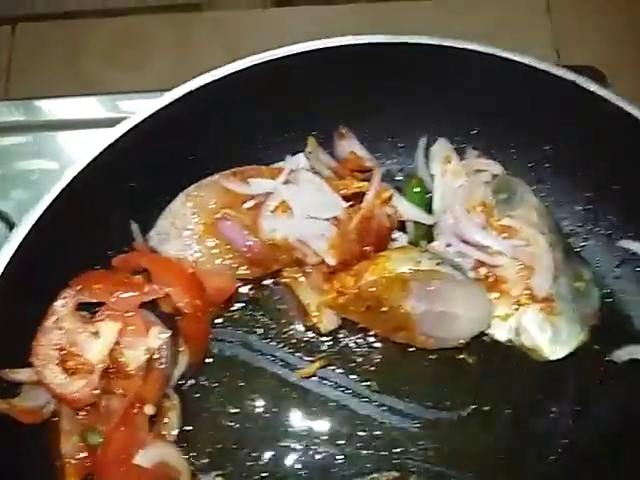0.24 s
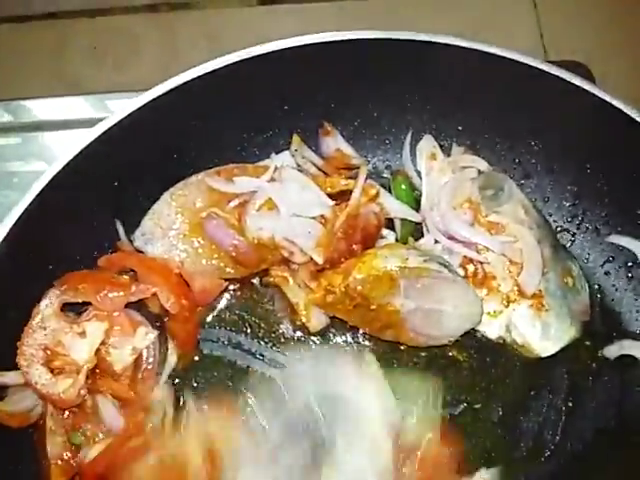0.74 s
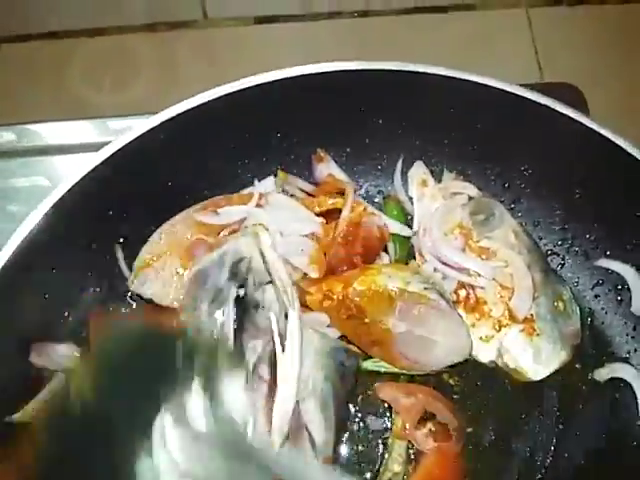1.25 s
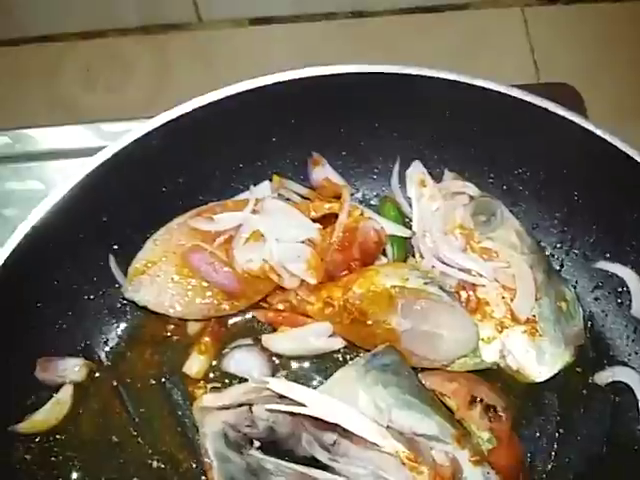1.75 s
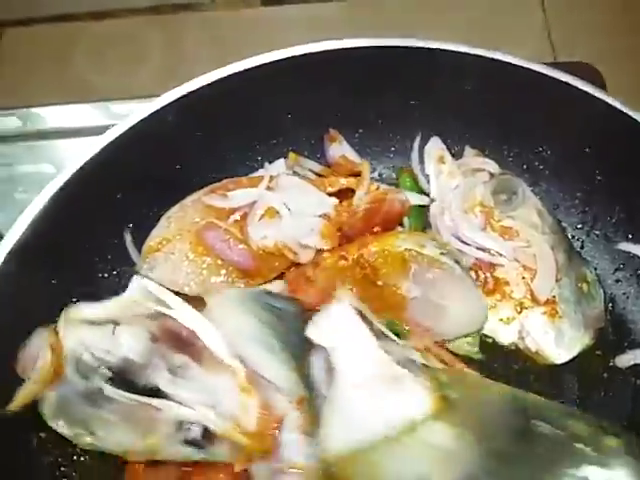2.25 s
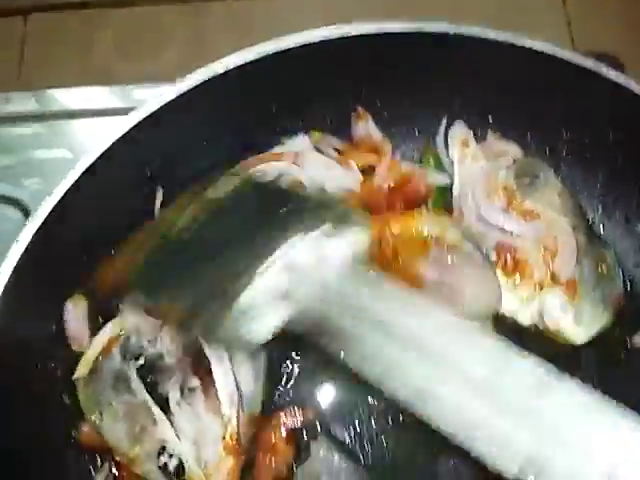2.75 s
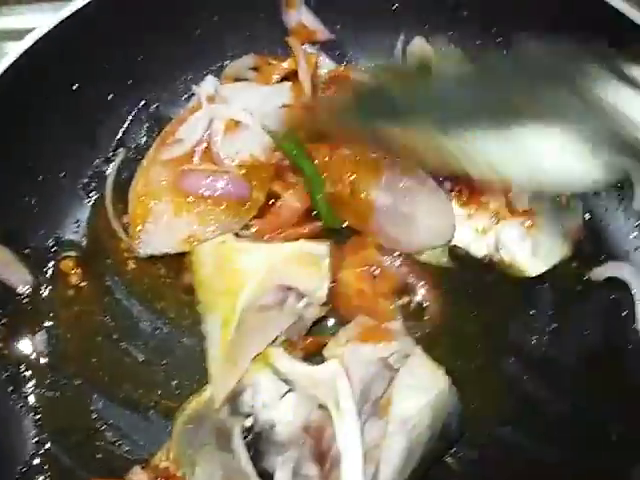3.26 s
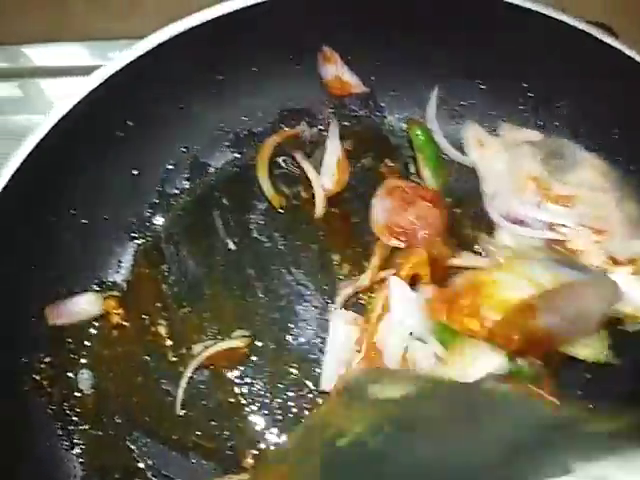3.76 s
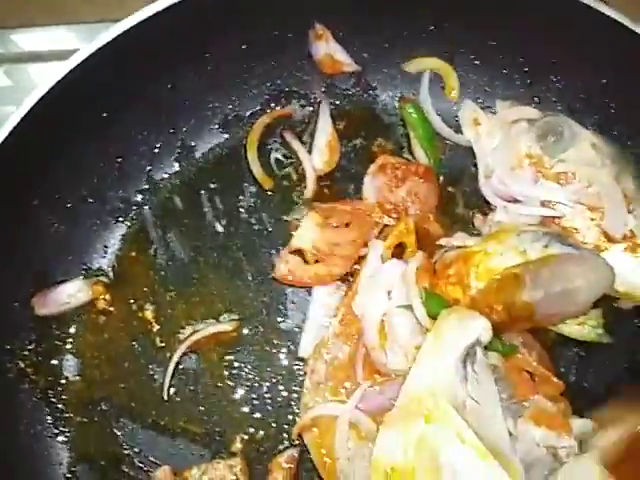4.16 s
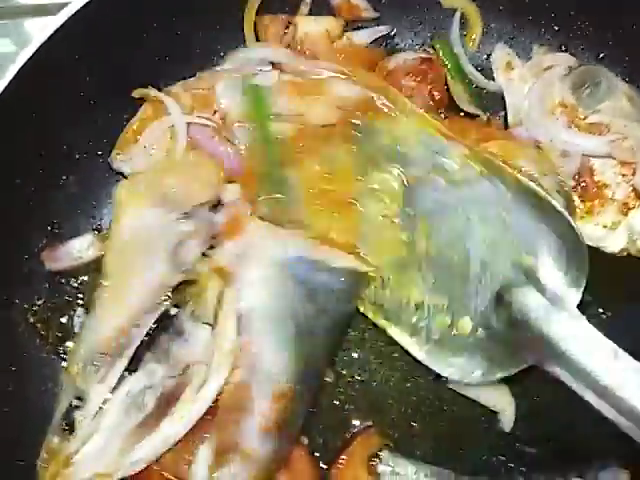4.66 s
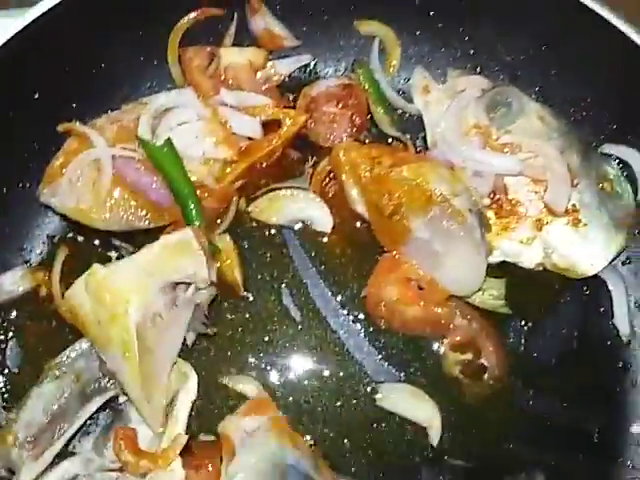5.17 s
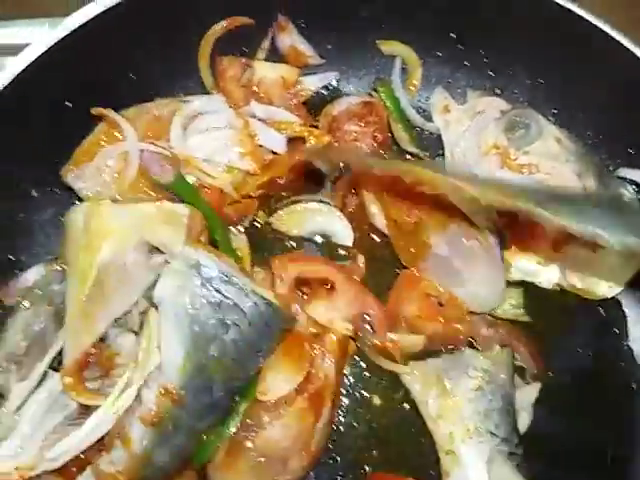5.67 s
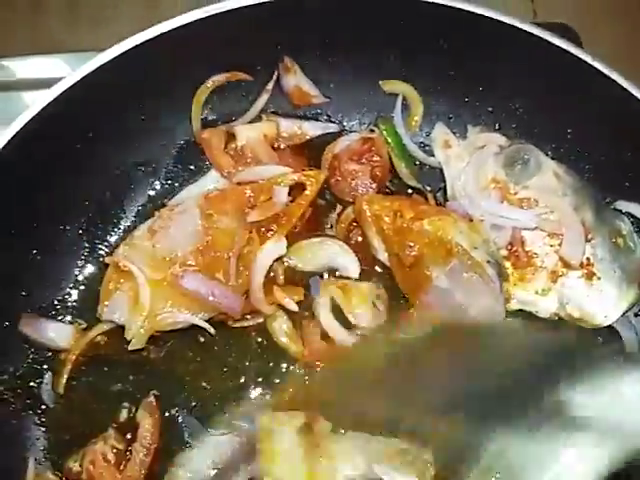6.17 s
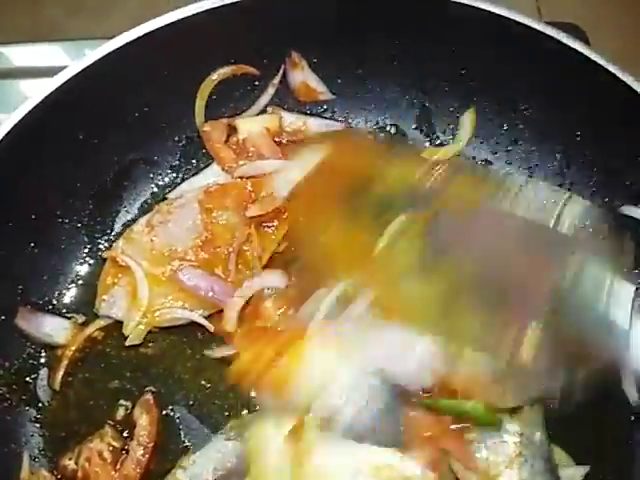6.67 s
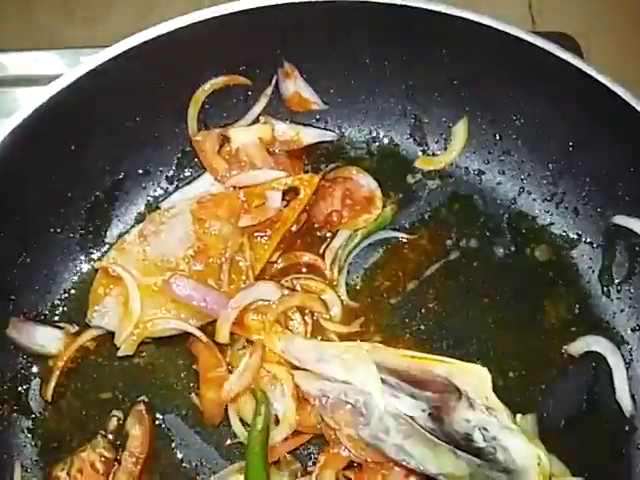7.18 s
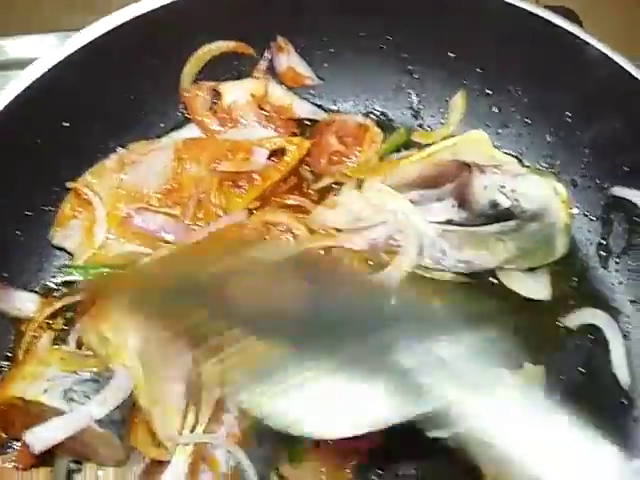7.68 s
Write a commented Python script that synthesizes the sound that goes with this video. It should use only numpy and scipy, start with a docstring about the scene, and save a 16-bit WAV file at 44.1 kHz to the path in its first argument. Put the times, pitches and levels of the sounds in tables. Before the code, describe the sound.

Close to the microphone, a metal spatula knocks against a frying pan and drags over its coating in quick, uneven strokes, now and then catching with a tiny squeal. Quiet wet slides of fish and vegetables and small ticks of oil fill the gaps. The strongest clanks come near the start, in the middle and twice near the end. A small kitchen adds short reverberation, low rumble and faint hum.

```python
"""A steel utensil knocks and scrapes in a nonstick pan, turning raw fish, onion and tomato in oil.
Each stroke sets the pan ringing as the edge lands and trips over the coating; sometimes it catches
in a short stick-slip squeal. Between strokes the wet food slides and squelches, and oil films snap.
A small tiled kitchen reverberates around it all, over a bed of low rumble and faint mains hum."""
import sys
import numpy as np
from scipy import signal
from scipy.fft import rfft, irfft
from scipy.io import wavfile
from scipy.ndimage import uniform_filter1d

SR = 44100
rng = np.random.default_rng(int(sys.argv[2]) if len(sys.argv) > 2 else 0)


def inscribe(sig):
    """Save sig as 16-bit PCM at rate SR to the path in sys.argv[1].

    A 1-D sig is mono; a 2-D sig holds one channel per row.
    Samples are clipped to [-1, 1] before scaling.
    """
    pcm = np.round(np.clip(np.atleast_2d(sig).T, -1, 1) * 32767)
    wavfile.write(sys.argv[1], SR, pcm.astype(np.int16))


N = 349272
TIME = np.arange(N) / SR
RING_TIME = TIME[:SR // 6]   # time axis of one ring of the pan

# tone of the room rumble: f/Hz, relative level/dB
RUMBLE_SPECTRUM = [(18, -60.5), (30, -22.5), (102, -1.5), (156, -10), (219, -16.5), (324, -8.5), (410, -16),
                   (455, -11), (591, -16), (639, -18), (1400, -24), (2300, -33), (2830, -34), (3880, -45.5),
                   (15500, -53.5)]
# partials of the mains hum: f/Hz, level/dB
HUM_PARTIALS = [(100, -65.5), (150, -64)]
# decay of the kitchen reverb: f/Hz, t60/s (capped in kitchen_reverb)
REVERB_DECAY = [(150, 0.77), (400, 0.58), (1200, 0.4), (3000, 0.43), (7000, .5), (15000, 0.86)]
# tone of the kitchen reverb: f/Hz, level/dB
REVERB_SPECTRUM = [(150, -21.5), (400, -11), (1200, -15.5), (3000, -10), (7000, -15.5), (15000, -13.5)]
# oil films snapping and scraps dropping: t/s, level/dB, f/Hz
WET_TICKS = [(0.055, -53, 6500), (0.1336, -44.5, 6200), (0.929, -37, 6000), (1.3488, -54.5, 6300),
             (2.4718, -44, 6250), (2.5422, -45, 5800), (2.974, -43, 5730), (4.584, -39, 4760),
             (4.7296, -47.5, 6350), (6.173, -37.5, 3550), (6.799, -46, 6900), (6.8313, -45, 7040),
             (6.8922, -47, 6460), (7.5878, -46, 7750), (7.7096, -46, 7200)]
# tone of the wet food: f/Hz, relative level/dB
FOOD_SPECTRUM = [(700, -16), (1100, 1.5), (1700, -7.5), (3500, -8.5), (5000, 4), (6600, 4), (8000, -23.5),
                 (12000, -42), (15500, -27.5)]
# food sliding: fastest moment t/s, length/s, smear level/dB, crackle level/dB, squelch f/Hz
FOOD_SLIDES = [(0.0, 0.28, -52.5, -55.5, 1200), (1.519, 0.23, -48.5, -57.5, 2780),
               (2.387, 0.57, -57, -66, 2220), (3.057, 0.29, -52, -59.5, 2760),
               (3.76, 0.31, -45, -55.5, 2100), (4.59, 0.3, -52, -58, 2110), (5.041, 0.3, -57, -68, 2700),
               (6.209, 0.22, -48.5, -55.5, 3260), (6.826, 0.35, -60, -62.5, 2400),
               (7.708, 0.42, -63.5, -75.5, 1600)]
# pan and blade ringing together: f/Hz, width/Hz, level/dB
RING_MODES = [(156.2, 4.9, -8), (239, 126, -24.5), (312, 15, 6), (351.6, 14.6, -4.5), (427, 24.8, 3),
              (526.5, 4.1, -6), (555, 55, -12.5), (608.7, 12, -1.5), (650.6, 6.2, -12.5), (698, 13, -6.5),
              (870, 6.7, -9), (1058, 28, -10), (1049, 43, 2), (1097, 25, 0), (1252, 5.1, -2),
              (1610, 127, -1), (1653, 40, 3.5), (1737, 53, -5.5), (1916, 9.8, -3), (2070, 220, -13.5),
              (2349, 22.5, -7.5), (2430, 120, -16.5), (3020, 19, -23.5), (3894, 220, -22.5),
              (4950, 280, -26.5), (6100, 105, -19), (6320, 110, -26), (6800, 160, -24.5), (8040, 88, -29),
              (9300, 160, -32), (10270, 330, -39)]
# wash of weaker modes between the clear ones: f/Hz, relative level/dB
WASH_SPECTRUM = [(100, -27), (250, -9.5), (600, -27.5), (850, -13), (1300, -6), (2600, -14.5), (4500, -24),
                 (6600, -21.5), (7600, -31), (11000, -38), (15500, -42.5)]
# short pitched squeals of the steel edge, and one squelch of sliding wet food at 3.79 s:
# middle t/s, length/s, f/Hz, level/dB
SQUEALS_AND_SQUELCH = [(0.837, 0.042, 3994, -35), (0.836, 0.04, 2320, -30), (0.861, 0.02, 1125, -34.5),
                       (2.159, 0.04, 1128, -20.5), (2.202, 0.051, 1129, -19.5), (3.078, 0.066, 1118, -37.5),
                       (3.71, 0.02, 3100, -29), (3.711, 0.034, 6900, -30), (3.79, 0.071, 2100, -37),
                       (4.42, 0.062, 1130, -25.5), (5.539, 0.052, 1670, -27.5), (5.604, 0.04, 1025, -25),
                       (6.66, 0.038, 1103, -32), (6.66, 0.042, 1607, -32), (7.432, 0.036, 1067, -15.5),
                       (7.453, 0.069, 1653, -27)]
# low, mid and high register of the knocks and strokes: lower f/Hz, upper f/Hz
REGISTERS = [(90, 800), (800, 2800), (2800, 17000)]
# steel striking the pan: t/s, thump level/dB, clank level/dB, tick level/dB
STEEL_KNOCKS = [(0.234, -56, -48, -51.5), (0.7235, -14.5, -18, -20), (1.9061, -23.5, -17.5, -25.5),
                (2.073, -16, -31, -23.5), (2.15, -28, -25, -24), (2.196, -27, -28, -29),
                (2.3749, -34, -28, -39), (3.023, -40, -39, -39), (3.536, -24, -30, -48),
                (3.776, -53, -40, -36.5), (4.1438, -12, -20, -19), (4.3246, -14, -20, -29),
                (4.3524, -20, -18.5, -12), (5.4205, -23.5, -26.5, -37), (5.5892, -33, -29, -26),
                (6.4747, -11.5, -13, -21.5), (7.366, -18, -10.5, -35)]
# steel dragging over the pan: start t/s, length/s, opening judder level/dB, judder fall/dB,
# final scrape level/dB, final grit level/dB, swell of scrape and grit/dB
STEEL_STROKES = [(0.718, 0.15, -31, 5, -26, -33, 15), (1.9, 0.16, -44.5, -1, -43, -51, -1.5),
                 (2.069, 0.14, -25, 18, -28, -37.5, -1.5), (3.03, 0.043, -54.5, -11.5, -36, -38, 19),
                 (3.533, 0.11, -34.5, -2, -41.5, -47.5, 4.5), (3.692, 0.027, -58, -10.5, -30.5, -30, 5.5),
                 (4.14, 0.16, -32, 0.5, -41, -34, 11.5), (4.333, 0.11, -27.5, 20, -27.5, -33.5, 3.5),
                 (5.414, 0.17, -36, -7, -26.5, -42.5, 18), (6.474, 0.19, -29.5, 12.5, -28.5, -32, 8.5),
                 (7.374, 0.091, -28, 1.5, -21.5, -36.5, 7)]


def from_db(db):
    """Decibels to gain."""
    return 10 ** (np.asarray(db) / 20)


def unit_rms(x):
    """Scale to unit rms."""
    return x / np.sqrt(np.mean(x ** 2) + 1e-20)


def at_hz(points, hz):
    """Read a table on a log-frequency axis."""
    f, value = np.transpose(points)
    return np.interp(np.log(np.maximum(hz, 1)), np.log(f), value)


def band(x, low_hz, high_hz, order=3):
    """Causal band-pass."""
    sos = signal.butter(order, [low_hz, min(high_hz, SR / 2 - 1)], "band", fs=SR, output="sos")
    return signal.sosfilt(sos, x + 1e-18)


def colour(x, spectrum):
    """EQ a noise with a spectrum table."""
    gain = from_db(at_hz(spectrum, np.fft.rfftfreq(len(x), 1 / SR)))
    return irfft(rfft(x) * gain, len(x))


def drift(per_s):
    """Random modulation of unit rms, gliding to a new value per_s times a second."""
    knots = rng.standard_normal(int(N / SR * per_s) + 2)
    return unit_rms(np.interp(TIME * per_s, np.arange(len(knots)), knots))


def add(out, start_s, sound):
    """Mix a sound in at a time."""
    start = max(round(start_s * SR), 0)
    out[start:start + len(sound)] += sound[:N - start]


def grains(per_s, spread_db):
    """Tiny contacts of uneven size at random moments."""
    sizes = from_db(spread_db * np.minimum(rng.exponential(1, N), 4)) * rng.choice([-1, 1], N)
    return sizes * (rng.random(N) < per_s / SR)


def levelled(x, over_s):
    """Ride the gain to hold the short-term level steady and keep the grain inside it."""
    return x / np.sqrt(uniform_filter1d(x ** 2, int(over_s * SR)) + 1e-9)


def room_tone(rumble_db=-53, waver_db=2.0, waver_below_hz=250, hum_waver_db=3):
    """The bed: steady kitchen noise with a wavering low end, and a wavering mains hum."""
    noise = unit_rms(colour(rng.standard_normal(N), RUMBLE_SPECTRUM)) * from_db(rumble_db)
    low = signal.sosfiltfilt(signal.butter(2, waver_below_hz, fs=SR, output="sos"), noise)
    hum = 0
    for hz, db in HUM_PARTIALS:
        amplitude = np.sqrt(2) * from_db(db + hum_waver_db * drift(6.3))
        hum += amplitude * np.sin(2 * np.pi * hz * TIME + .5 * drift(14))
    return noise - low + low * from_db(waver_db * drift(22)) + hum


def kitchen_reverb(x, build_s=0.0018, longest_t60_s=0.8):
    """Diffuse reflections off the tiles, each octave dying at its own rate."""
    t, response = TIME[:SR], 0
    octave_edges_hz = 90 * 2. ** np.arange(9)
    for low, high in zip(octave_edges_hz, octave_edges_hz[1:]):
        hz = np.sqrt(low * high)
        t60 = min(at_hz(REVERB_DECAY, hz), longest_t60_s)
        decay = np.exp(-np.log(1000) * t / t60) * (1 - np.exp(-t / build_s))
        tail = band(rng.standard_normal(SR) * decay / np.linalg.norm(decay), low, high)
        response += from_db(at_hz(REVERB_SPECTRUM, hz)) * tail
    return signal.fftconvolve(x, response)[:N]


def wet_ticks(decay_s=0.0039, splash_db=-13, trim_db=1.0):
    """An oil film snaps or a scrap drops: a brief pitched pop in a broad splash."""
    out, t = np.zeros(N), TIME[:SR // 20]
    for start, db, hz in WET_TICKS:
        burst = rng.standard_normal(len(t)) * np.exp(-t / decay_s)
        pop = band(burst, hz * 0.887, hz * 1.1, order=2)
        snap = pop + from_db(splash_db) * band(burst, 4500, 9100, order=2)
        add(out, start, from_db(db + trim_db) * snap / np.abs(snap).max())
    return out


def slide_swell(progress, rise_share=0.45, ends_db=-13.5):
    """A piece of food gathers speed, peaks at progress 0 and settles a little more slowly."""
    from_peak = np.maximum(-progress / rise_share, progress / (1 - rise_share))
    return from_db(ends_db * from_peak ** 2)


def sliding_food(rings, clump_db=4.0, ring_db=5, pop_db=-5, squelch_db=-2.5, squelch_octaves=0.49):
    """Oily pieces peel off in clumps of tiny snaps, stirring the pan and the wet gap under each piece."""
    snaps = levelled(grains(per_s=4500, spread_db=1.5) * from_db(clump_db * drift(90)), over_s=0.025)
    ringing = signal.fftconvolve(snaps, rings.sum(axis=0))[:N]
    texture = colour(snaps, FOOD_SPECTRUM) + from_db(ring_db) * ringing
    body = unit_rms(band(texture, 610, 4100, order=4))
    fizz = unit_rms(band(texture, 3300, 9000))
    pops = unit_rms(band(grains(per_s=53, spread_db=2.0), 3000, 8000))   # small oil films bursting
    crackle = unit_rms(fizz + from_db(pop_db) * pops)
    out, edge_ratio = np.zeros(N), 2 ** (squelch_octaves / 2)
    for fastest, length, smear_db, crackle_db, hz in FOOD_SLIDES:
        on = np.abs(TIME - fastest) < length
        squelch = unit_rms(band(snaps[on], hz / edge_ratio, hz * edge_ratio, order=1))   # gap resonance
        smear = unit_rms(body[on] + from_db(squelch_db) * squelch)
        swell = slide_swell((TIME[on] - fastest) / length)
        out[on] += swell * (from_db(smear_db) * smear + from_db(crackle_db) * crackle[on])
    return out


def mode_rings():
    """One dying sine per mode of the pan, in rows of alternating polarity; wider modes die sooner."""
    rings = []
    for k, (hz, width, db) in enumerate(RING_MODES):
        gain = (-1) ** k * from_db(db) * 2 * np.pi * width / SR
        rings.append(gain * np.exp(-np.pi * width * RING_TIME) * np.sin(2 * np.pi * hz * RING_TIME))
    return np.array(rings)


def pan_response(rings, wash_db, spread_db, wash_t60_s):
    """The pan's voice at one contact spot: a fresh balance of clear modes over a fast-dying wash."""
    modes = from_db(spread_db * rng.standard_normal(len(rings))) @ rings
    decay = np.exp(-np.log(1000) * RING_TIME / wash_t60_s)
    wash = colour(rng.standard_normal(len(RING_TIME)), WASH_SPECTRUM) * decay / np.linalg.norm(decay)
    return modes + from_db(wash_db) * wash


def squeals_and_squelch(waver=0.0081, rough_db=5.0, octave_db=-19, trim_db=-1.0):
    """Brief rough tones with a weak octave: stick-slip squeals of the edge and one wet food squelch."""
    out = np.zeros(N)
    wander, flutter = drift(400), from_db(rough_db * drift(220))
    for middle, length, hz, db in SQUEALS_AND_SQUELCH:
        on = np.abs(TIME - middle) < length / 2
        looseness = waver * np.sqrt(hz / 1000)   # higher tones hold their pitch less firmly
        phase = 2 * np.pi * np.cumsum(hz * (1 + looseness * wander[on])) / SR
        tone = np.sin(phase) + from_db(octave_db) * np.sin(2 * phase)
        swell = np.cos(np.pi * (TIME[on] - middle) / length) ** 2
        out[on] += from_db(db + trim_db) * swell * flutter[on] * tone
    return out


def steel_knocks(rings, chatter_db=-28, chatter_s=0.0024, crack_db=-14, trims_db=(-1.0, 0.0, 0.5),
                 rebound_s=0.012, rebound_loss_db=(3.5, 13.5, 16.5)):
    """The blade hits the pan with a brief chatter, then comes down again, softer and duller."""
    out, n = np.zeros(N), len(RING_TIME)
    rebounds = [(start + rebound_s * rng.uniform(.8, 1.2), *np.subtract(levels_db, rebound_loss_db))
                for start, *levels_db in STEEL_KNOCKS]
    for start, *levels_db in STEEL_KNOCKS + rebounds:
        chatter = rng.standard_normal(n) * (rng.random(n) < .15)
        force = from_db(chatter_db) * chatter * np.exp(-RING_TIME / chatter_s)
        force[0] = 1   # the hit itself
        pan = pan_response(rings, wash_db=-2.0, spread_db=4.5, wash_t60_s=0.1)
        crack = from_db(crack_db) * band(force, 330, 2300, order=2)   # attack ahead of the ring
        hit = crack + signal.fftconvolve(force, pan)[:n]
        for edges, db, trim_db in zip(REGISTERS, levels_db, trims_db):
            layer = band(hit, *edges)
            add(out, start, from_db(db + trim_db) * layer / np.abs(layer).max())
    return out


def stroke_forces(t, length, judder_db, fall_db, scrape_db, grit_db, swell_db,
                  attack_s=0.006, release_s=0.0086):
    """Judder, scrape and grit envelopes: the blade lands flat, then its edge bites until it lifts."""
    travel = np.clip(t / length, 0, 1)
    contact = np.clip(t / attack_s, 0, 1) * np.exp(-np.maximum(t - length, 0) / release_s)
    levels_db = (judder_db - fall_db * travel,
                 scrape_db - swell_db * np.interp(travel, (0.3, 0.83), [1, 0]),
                 grit_db - swell_db * np.interp(travel, (0.44, 0.65), [1, 0]))
    return contact * from_db(levels_db)


def steel_scrapes(rings, slips_per_s=350, slip_db=4.0, spots=3, trims_db=(-0.8, -0.8, -0.2)):
    """The edge trips over the coating in uneven slips; the colour shifts as it crosses the pan."""
    slips = grains(per_s=7000, spread_db=3.0) * from_db(slip_db * drift(slips_per_s))
    friction = levelled(slips, over_s=0.018)   # a steady hand
    out = np.zeros(N)
    for start, length, *levels_db in STEEL_STROKES:
        on = (TIME >= start) & (TIME < start + length + .06)
        t = TIME[on] - start
        position = (spots - 1) * np.minimum(t / length, 1)
        crossfades = [np.sqrt(np.maximum(1 - np.abs(position - k), 0)) for k in range(spots)]
        pans = [pan_response(rings, wash_db=-0.1, spread_db=5.5, wash_t60_s=0.051) for _ in range(spots)]
        for edges, force, trim_db in zip(REGISTERS, stroke_forces(t, length, *levels_db), trims_db):
            for fade, pan in zip(crossfades, pans):
                envelope = force * fade
                layer = band(signal.fftconvolve(friction[on] * envelope, pan), *edges)
                add(out, start, from_db(trim_db) * layer * np.linalg.norm(envelope) / np.linalg.norm(layer))
    return out


def scene():
    """Steel, pan and food up close, with the kitchen behind, in mono."""
    rings = mode_rings()
    steel = steel_scrapes(rings) + steel_knocks(rings)
    close = steel + squeals_and_squelch() + sliding_food(rings) + wet_ticks()
    return (close + kitchen_reverb(close) + room_tone())[None]


def record(dry, bass_cut_hz=45, top_cut_hz=15800):
    """The small microphone drops the deepest bass; the top is cut steeply."""
    thin = signal.sosfilt(signal.butter(3, bass_cut_hz, "high", fs=SR, output="sos"), dry)
    return signal.sosfilt(signal.ellip(10, .1, 80, top_cut_hz, fs=SR, output="sos"), thin)


dry = scene()
out = record(dry)
inscribe(out)
```